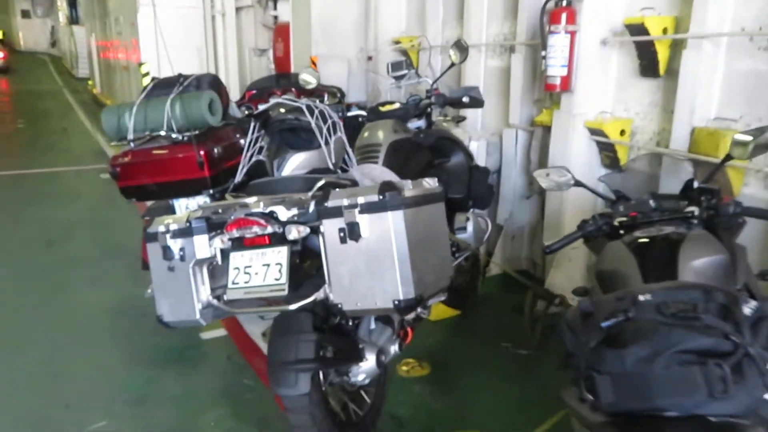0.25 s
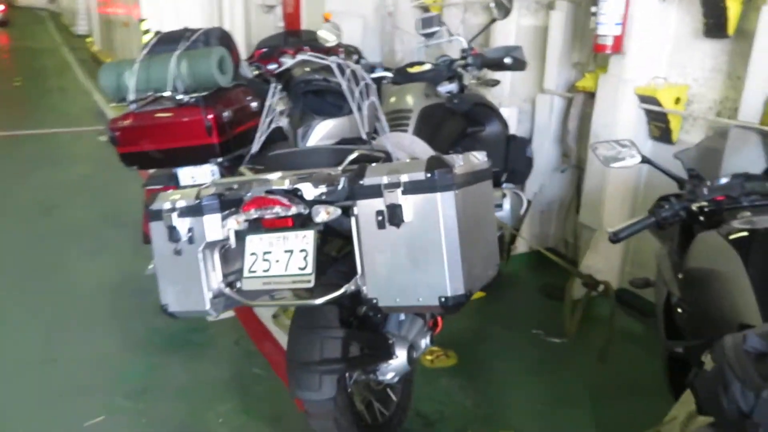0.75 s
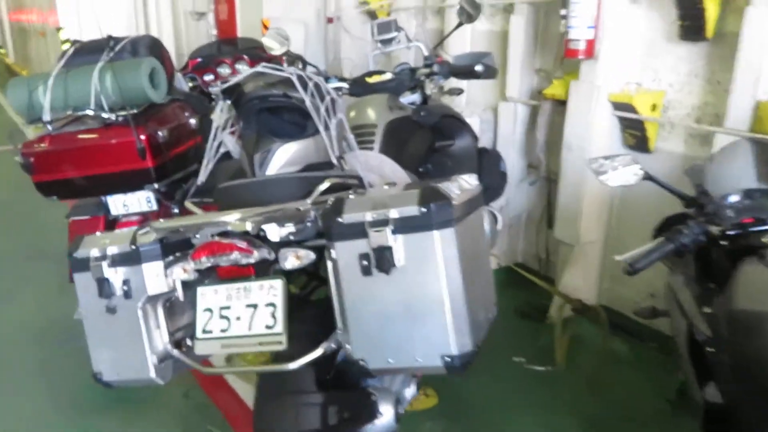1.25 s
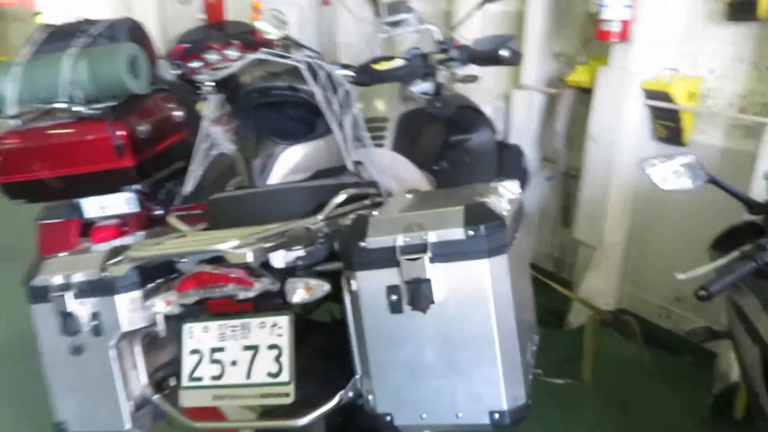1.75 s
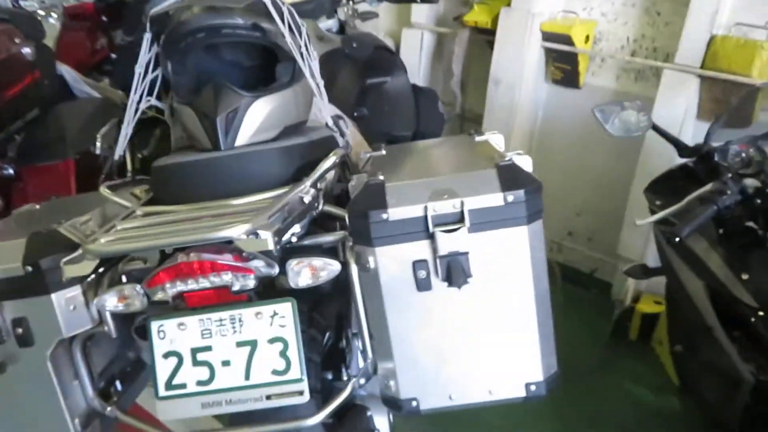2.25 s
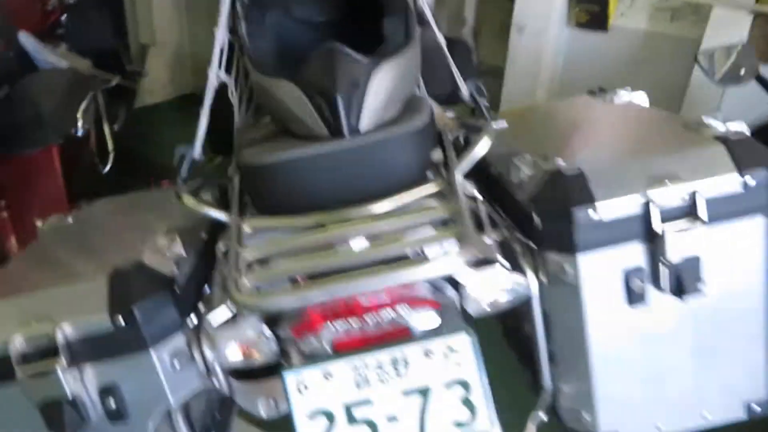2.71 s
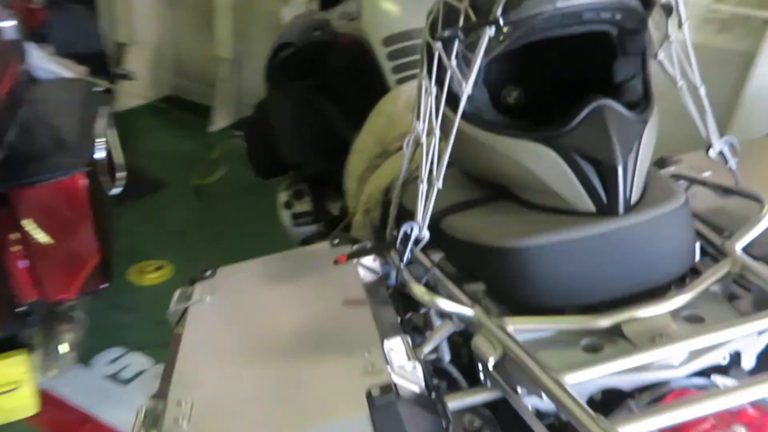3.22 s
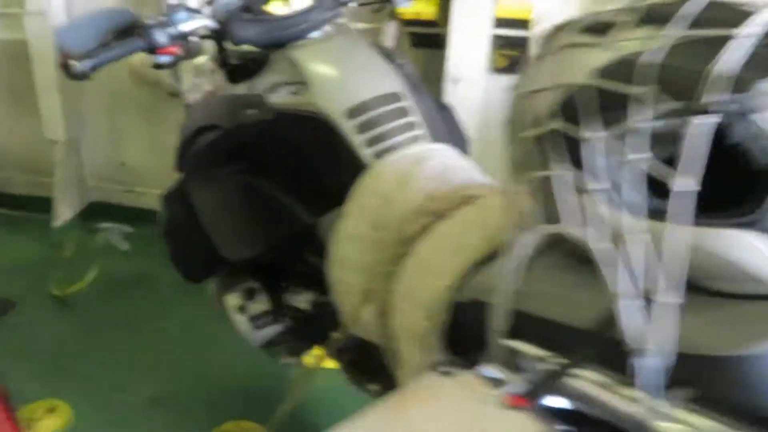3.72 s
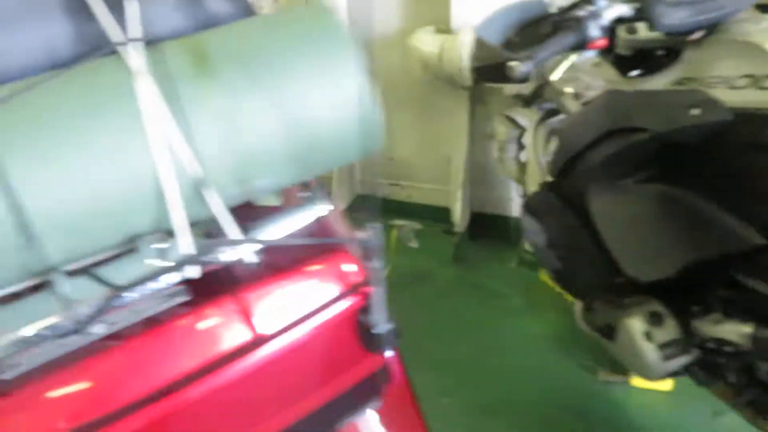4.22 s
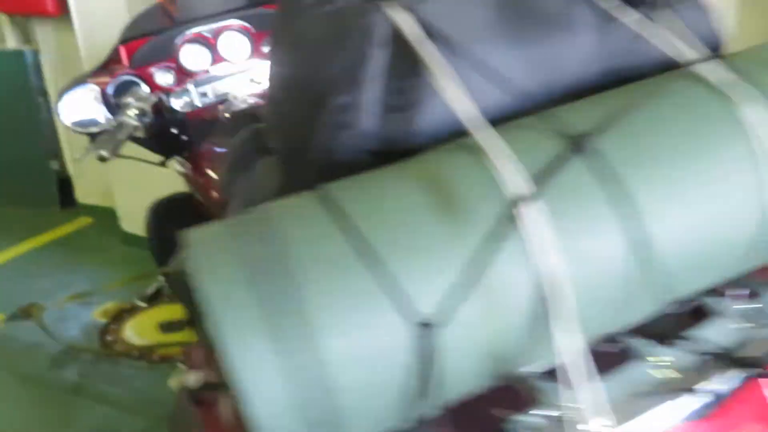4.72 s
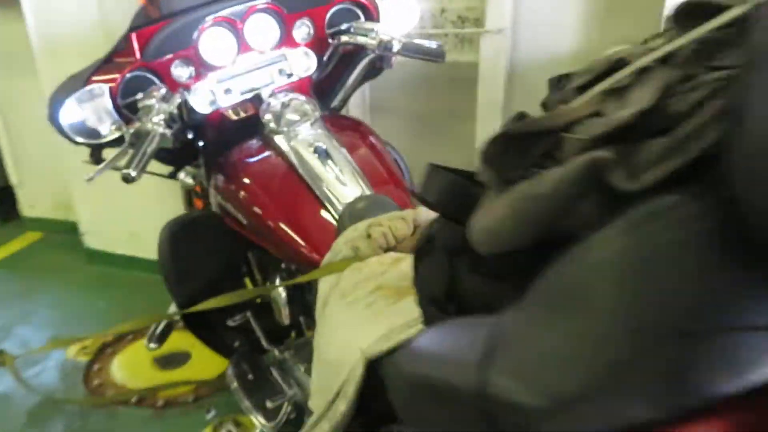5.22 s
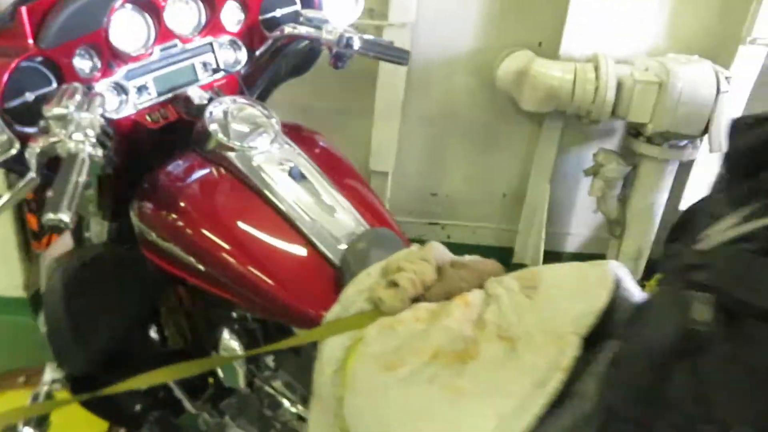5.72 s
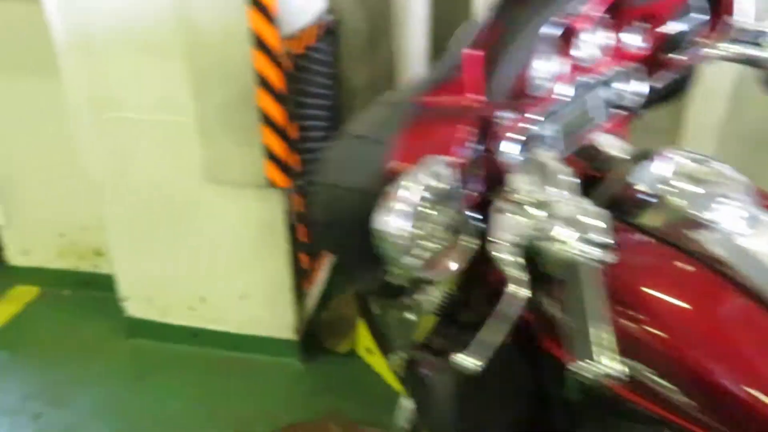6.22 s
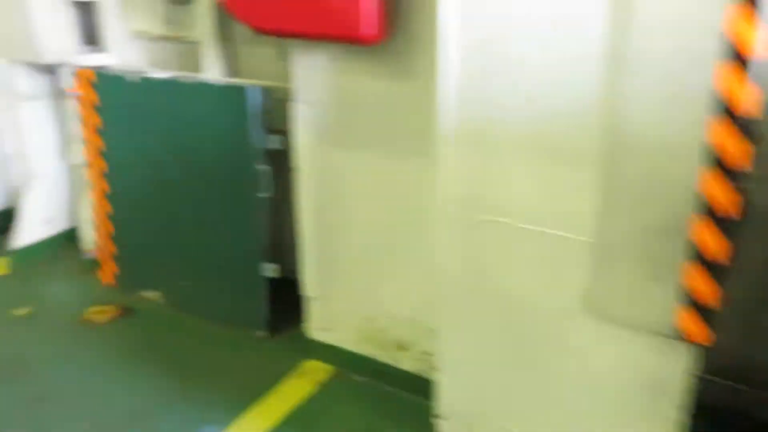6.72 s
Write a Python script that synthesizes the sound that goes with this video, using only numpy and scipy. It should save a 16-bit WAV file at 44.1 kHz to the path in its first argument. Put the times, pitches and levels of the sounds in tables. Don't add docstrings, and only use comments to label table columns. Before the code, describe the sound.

Loud, steady low engine hum and rumbling air fill an enclosed steel ferry deck, swelling and fading, with cloth brushes and tiny strap squeaks.

```python
import sys
import numpy as np
from scipy import signal
from scipy.fft import rfft, irfft, next_fast_len
from scipy.io import wavfile
from scipy.ndimage import uniform_filter1d, minimum_filter1d

SR = 44100
rng = np.random.default_rng(int(sys.argv[2]) if len(sys.argv) > 2 else 0)


def magnitude_from_level(level_db):
    exponent = np.asarray(level_db, float) / 20
    return 10 ** exponent


def store_pcm(level_fs):
    pcm = np.round(np.clip(level_fs, -1, 1) * 32767).astype(np.int16)
    wavfile.write(sys.argv[1], SR, np.atleast_2d(pcm).T)


N = 306620
HOP = 64


def unit(x):
    return x / np.sqrt(np.mean(x ** 2))


def clock():
    return np.arange(0, N + HOP, HOP) / SR


def full(control):
    return np.interp(np.arange(N) / SR, clock(), control)


def curve(table):
    return np.interp(clock(), *np.transpose(table))


def at(table, hz):
    table_hz, value = np.transpose(table)
    return np.interp(np.log(hz), np.log(table_hz), value)


def swells(rows):
    total = 0
    for middle_s, db, length_s in rows:
        total = total + db * np.cos(np.pi * np.clip((clock() - middle_s) / length_s, -.5, .5)) ** 2
    return total


def walk(rate_hz):
    hold = int(SR / HOP / rate_hz)
    x = np.repeat(rng.standard_normal(200), hold)
    x = uniform_filter1d(uniform_filter1d(x, hold), hold)[:len(clock())]
    return (x - x.mean()) / x.std()


def resonance(hz, width_hz, order=2):
    sos = signal.butter(order, [hz - width_hz / 2, hz + width_hz / 2], "bandpass", fs=SR, output="sos")
    return unit(signal.sosfilt(sos, rng.standard_normal(N + SR))[SR:])


def tone(hz, wander_hz):
    speed_hz = hz + wander_hz * full(walk(2.975))
    return np.sqrt(2) * np.sin(2 * np.pi * np.cumsum(speed_hz) / SR)


# t/s, level/dB
ORDER = [(0, -20.5), (.15, -18.5), (.42, -27.5), (.95, -28), (1.08, -20.5), (1.3, -30.5), (1.58, -12),
         (1.8, -12.5), (1.93, -23), (2.12, -17), (2.5, -22), (2.65, -34), (3.17, -24.5), (4.1, -16.5),
         (4.3, -27), (4.75, -20.5), (6.5, -23), (6.8, -47)]
# middle t/s, level/dB, length/s
ORDER_NODES = [(3.17, 12.5, 0.098), (2.6, -7, .12), (1.93, -10, 0.15), (4.45, 5.5, 0.3), (4.95, -1, 0.34),
               (5.42, 2, 0.29), (5.2, 1, 0.136), (5.2, 6, .14), (6.25, 3.5, .3), (2.8, 9, .2),
               (4.4, -3, 0.41)]


def engine_order():
    flutter_db = 0.9 * walk(10.0)
    return full(magnitude_from_level(curve(ORDER) + swells(ORDER_NODES) + flutter_db)) * tone(133, 0.59)


# middle t/s, level/dB, length/s
LOW_CRESTS = [(.08, 10, 0.4), (1.0, 5.5, 0.43), (2.05, 6, 0.54), (2.9, 4.5, 0.46), (3.5, 12, 0.32),
              (3.9, -1, .3), (4.72, 7.5, 0.2), (5.3, 11, 1), (5.87, 4, 0.3), (6.4, 3.5, 0.4),
              (6.75, 7.5, 0.48)]
# middle t/s, level/dB, length/s
UPPER_CRESTS = [
    (1.42, 7.3, 0.28),
    (2.5, 5.3, 0.18),
    (2.86, 9.7, 0.17),
    (3.55, 8.7, 1.3),
    (4.72, 16, 0.42),
    (5.25, 8.5, 1.1),
    (5.65, 11.8, 0.32),
    (6.55, 12.3, 0.31),
]


def deck_hum():
    low = .45 * tone(67.5, wander_hz=2.5) + .85 * resonance(68.3, 20.3)
    upper = .9 * tone(144, wander_hz=2.0) + .35 * resonance(144, 13.7)
    low_gain = full(magnitude_from_level(-27.5 + swells(LOW_CRESTS)))
    upper_gain = full(magnitude_from_level(-29.5 + swells(UPPER_CRESTS)))
    return low_gain * low + upper_gain * upper


# middle t/s, level/dB, length/s
THUMPS = [
    (.7, 2, .4),
    (1.7, -4, .5),
    (3.1, -8.5, 1.7),
    (4.59, 4.5, .15),
    (5.2, 3, .5),
    (5.8, -3, .4),
    (6.8, 5, .5),
]


def sway_db():
    return swells(THUMPS)


def shaft():
    return full(magnitude_from_level(-38 + sway_db())) * resonance(47.8, 6.4)


# t/s, level/dB
DUCT = [
    (0, 2.5),
    (1.4, 1),
    (1.8, 2),
    (2.6, 1.5),
    (3.5, -3),
    (4.05, -1.5),
    (4.9, 0.5),
    (5.7, -3),
    (6.5, 1),
    (6.95, -0.5),
]


def duct_db():
    return curve(DUCT)


# f/Hz, width/Hz
FAN_TONES = [(178, 3.77), (268, 65), (326, 2.65), (651, 45)]
FAN_DB = (-37, -30, -35.5, -37.5)
FAN_FOLLOW = (0.25, 0.95, 0.33, 1.6)
# middle t/s, level/dB, length/s
FAN_CRESTS = [
    [(.15, 6, .4), (.9, 4.5, 0.46), (1.55, 6.7, 0.3), (2.25, 13, 0.89), (3.27, 16, 0.44), (4.72, 14, 0.35),
     (5.5, 14, 0.4), (6.6, 12, .9)],
    [(.75, 3, 0.62), (1.2, 4, .3), (2.42, 8.2, 0.64), (3.25, 11.7, 0.36), (4.9, 3, .4), (5.4, 7.7, 0.45),
     (6.0, 4, 0.26), (6.7, 8, 0.54)],
    [(.65, 6.7, 0.45), (1.35, 16.4, 0.16), (2.8, 5.2, 0.64), (4.52, 12, 0.97)],
    [(.05, 8.2, 0.56), (1.25, 5.3, 1), (2.4, 6.2, 0.51), (2.85, 10.7, 0.49), (5.0, 6.1, .8),
     (5.95, 10.2, 0.91)],
]


def fan_blades():
    out = 0
    for (hz, width_hz), db, follow, crests in zip(FAN_TONES, FAN_DB, FAN_FOLLOW, FAN_CRESTS):
        source = tone(hz, width_hz / 3) if width_hz < 8 else resonance(hz, width_hz)
        out = out + full(magnitude_from_level(db + follow * duct_db() + swells(crests))) * source
    return out


def hull():
    return engine_order() + shaft() + deck_hum() + fan_blades()


# f/Hz, level/dB
PORTS = [(60, -47), (110, -32.5), (200, -26.5), (380, -24.5), (700, -22.5), (1290, -17), (2380, -12.5),
         (4400, -7.5), (8120, -2.5), (15000, 4.5)]


def port_side_db(hz):
    return at(PORTS, hz)


# start t/s, length/s, low f/Hz, high f/Hz, level/dB
BRUSHES = [
    (2.47, 0.51, 780, 1470, -26.5),
    (2.56, 0.45, 1050, 1640, -36),
    (2.854, 0.21, 800, 1650, -31),
    (2.888, 0.59, 1300, 1570, -38),
    (3.052, 1, 2300, 4370, -42.5),
    (3.098, 0.42, 1900, 3780, -44),
    (4.546, 0.17, 1000, 1970, -30.5),
    (4.576, .3, 900, 1880, -36.5),
    (3.95, 0.96, 3300, 5500, -53),
    (5.6, 0.57, 3000, 6000, -54),
]


def brushes():
    out, t = 0, np.arange(N) / SR
    for start_s, length_s, low_hz, high_hz, db in BRUSHES:
        hz, width_hz = (low_hz + high_hz) / 2, high_hz - low_hz
        swell = np.sin(np.pi * np.clip((t - start_s) / length_s, 0, 1)) ** 1.3
        swell = swell * full(magnitude_from_level(db + 0.6 * walk(23.0)))
        mid = resonance(hz, width_hz, order=3)
        side = magnitude_from_level(port_side_db(hz)) * resonance(hz, width_hz)
        out = out + swell * (mid + side * np.array([[1], [-1]]))
    return out


# t/s, relative level/dB, f/Hz, length/s
SQUEAKS = [
    (1.046, -50, 8620, .03),
    (1.806, -49, 8100, .12),
    (1.91, -51, 7980, .06),
    (1.97, -52, 7950, .04),
    (2.767, -51, 8460, .04),
    (3.104, -49, 8560, 0.066),
    (4.626, -40, 8510, .014),
    (5.074, -55, 8460, 0.033),
    (6.65, -48, 8230, .045),
    (6.93, -53, 8400, 0.018),
]


def squeaks():
    out = np.zeros((2, N))
    for start_s, db, hz, length_s in SQUEAKS:
        size = int(np.clip(length_s, .006, .2) * SR)
        slip_rad = .17 * np.cumsum(rng.standard_normal(N // 30))[:size]
        port_rad = np.array([[.6], [-.6]])
        phase = 2 * np.pi * hz * np.arange(size) / SR + slip_rad + port_rad
        i = int(start_s * SR)
        out[:, i:i + size] += magnitude_from_level(db - 3.0) * np.hanning(size) ** 0.65 * np.sin(phase)
    return out


# t/s, relative level/dB, left minus right level/dB
TICKS = [
    (4.5994, -29.5, -0.5),
]


def ticks():
    out = np.zeros((2, N))
    t = np.arange(-64, 64) / SR
    snap = -np.tanh(t * SR * 3) * np.exp(-np.abs(t) / 4e-5)
    for start_s, db, pan_db in TICKS:
        i = int(start_s * SR) + 2
        port_db = np.array([[pan_db], [-pan_db]]) / 2
        out[:, i:i + 128] += magnitude_from_level(db + 15.5 + port_db) * snap
    return out


# start t/s, length/s, treble level/dB
RUSTLES = [(.4, 0.71, 1), (1.1, 0.43, 1), (1.752, 0.5, 2.5), (2.098, 0.62, 3), (2.903, 1.23, 6.5),
           (3.897, 0.3, 5), (4.554, 0.54, 3), (5.397, 0.37, 2.5), (6.165, 0.38, 3.5), (6.494, 0.25, 3.5),
           (6.76, 0.22, 3.5)]
# middle t/s, treble level/dB, length/s
FLICKS = [
    (1.39, 1, 0.082),
    (2.85, 2.5, .07),
    (3.15, 3, .1),
    (4.7, 5, 0.067),
    (5.08, 3.5, 0.09),
    (5.45, 2.5, 0.072),
    (5.69, 2, 0.063),
    (6.24, 3, 0.092),
    (6.85, 1.5, 0.091),
]


def rustle_db():
    jacket = [(start_s + length_s / 2, db, length_s) for start_s, length_s, db in RUSTLES]
    return swells(jacket) + swells(FLICKS) - 4.0


# f/Hz, level/dB per Hz
ROAR = [(13, -53), (22, -19), (59, -7), (102, -7), (121, -5), (138, -5), (198, -5.5), (324, -8.5),
        (489, -14), (661, -14.5), (1180, -25), (1420, -28.5), (4390, -46), (11200, -63.5), (15500, -70)]
# f/Hz, share
DUCT_REACH = [(120, .05), (260, 0.37), (480, 0.82), (850, 1), (1900, .05)]
# f/Hz, share
RUSTLE_REACH = [(2600, 0.12), (6000, 1), (10000, 1), (15000, .6)]
# middle t/s, level/dB, length/s
HISS_DIPS = [
    (2.5, -2.5, .3),
    (3.0, -2.5, .2),
    (3.85, -4.5, 1.5),
    (4.68, -4, .12),
    (5.2, -2.5, .3),
    (5.9, -2, .5),
]
# f/Hz, share
HISS_DIP_REACH = [(10500, 0), (14500, 1)]


def air():
    size = next_fast_len(N)
    f = np.maximum(np.arange(size // 2 + 1) * SR / size, 1)
    mid = rfft(rng.standard_normal(size)) * magnitude_from_level(at(ROAR, f))
    side = rfft(rng.standard_normal(size)) * magnitude_from_level(at(ROAR, f) + port_side_db(f))
    near_db, cloth_db, hiss_dip_db = duct_db(), rustle_db(), swells(HISS_DIPS)
    out, common_flicker = 0, walk(3.17)
    for octave in np.arange(0, 10, 1 / 3):
        hz = 22 * 2 ** octave
        share = np.cos(np.pi / 2 * np.clip(3 * np.log2(f / hz), -1, 1)) ** 2
        db = at(DUCT_REACH, hz) * near_db + at(RUSTLE_REACH, hz) * cloth_db
        db = db + at(HISS_DIP_REACH, hz) * hiss_dip_db
        if hz < 40:
            db = db + sway_db()
        flicker_db = 0.61 * common_flicker + 0.93 * walk(11.0)
        db = db + 0.66 * walk(2.23) + min(hz / 6200.0, 1.1) * flicker_db
        m = irfft(mid * share, size)[:N]
        s = irfft(side * share, size)[:N]
        out = out + full(magnitude_from_level(db)) * np.array([m + s, m - s])
    return unit(out) * magnitude_from_level(-15.5)


def scene():
    return hull() + brushes() + squeaks() + ticks() + air()


def low_pass(x):
    return signal.sosfilt(signal.butter(12, 15690, fs=SR, output="sos"), x)


# t/s, gain level/dB
GAIN = [(0, -1), (.45, -0.5), (.7, 0.5), (1.4, 0.5), (1.55, -1), (1.78, -3.5), (2.4, 0.5), (2.86, 1.5),
        (2.88, -0.5), (3.1, 0), (3.5, 0), (3.9, -1), (4.05, -2), (4.3, -1), (4.7, -1), (5.3, -1), (5.65, 0),
        (5.95, -2), (6.3, -0.5)]


def record(dry):
    dry = dry * full(magnitude_from_level(uniform_filter1d(curve(GAIN), size=50)))
    ceiling, window = 0.74, 441
    room = np.minimum(1, ceiling / np.maximum(np.abs(dry).max(axis=0), 1e-6))
    gain = uniform_filter1d(minimum_filter1d(room, size=window), size=window)
    top = signal.ellip(8, .3, 50, 15600, fs=SR, output="sos")
    mix = signal.sosfilt(top, dry * gain)
    return low_pass(mix)


dry = scene()
out = record(dry)
store_pcm(out)
```